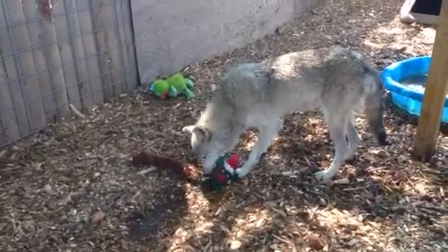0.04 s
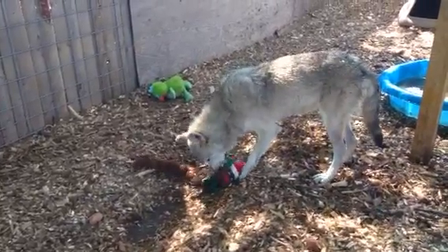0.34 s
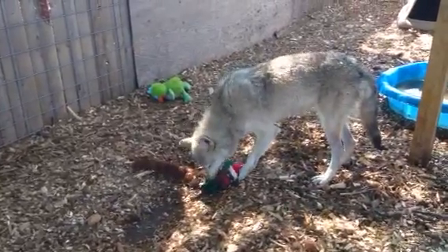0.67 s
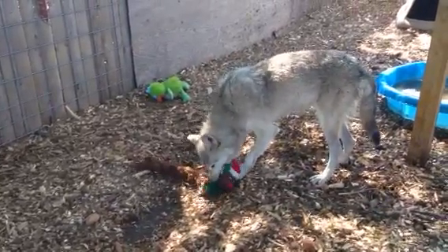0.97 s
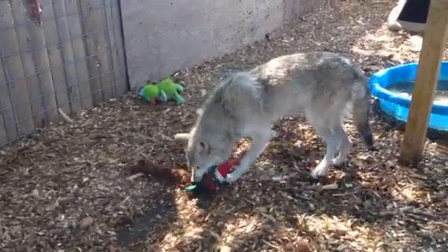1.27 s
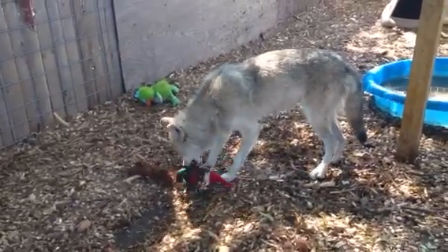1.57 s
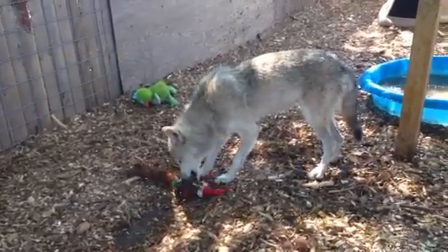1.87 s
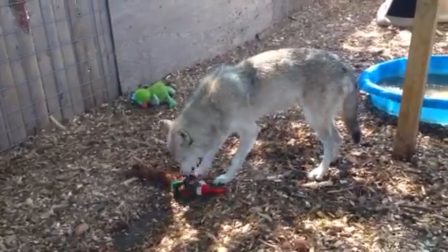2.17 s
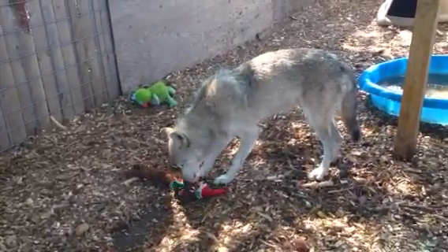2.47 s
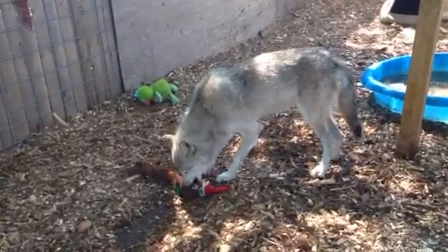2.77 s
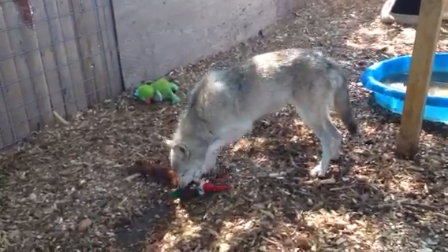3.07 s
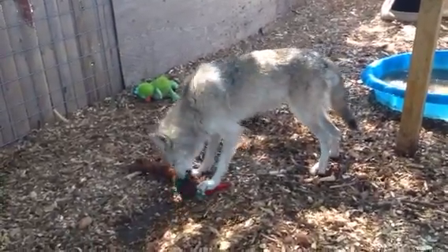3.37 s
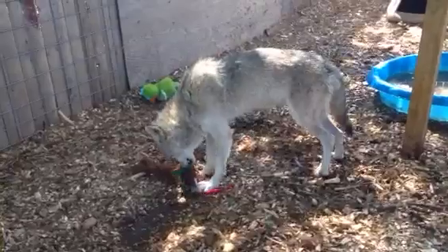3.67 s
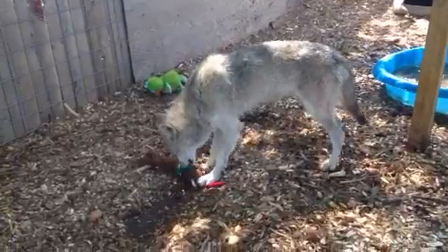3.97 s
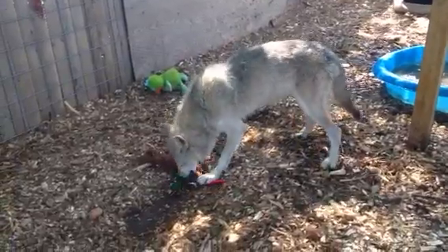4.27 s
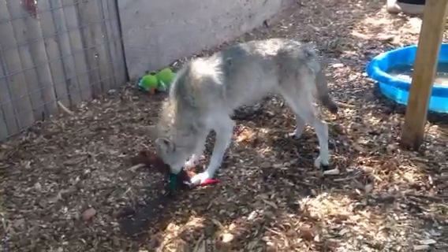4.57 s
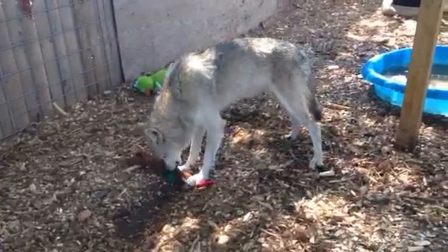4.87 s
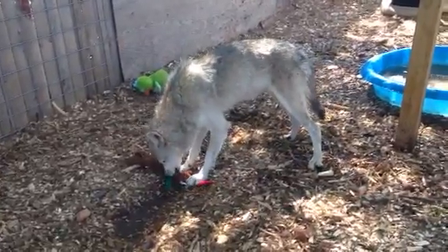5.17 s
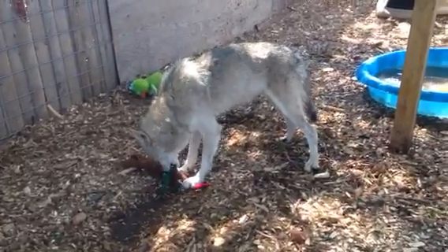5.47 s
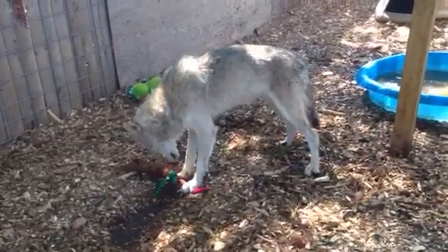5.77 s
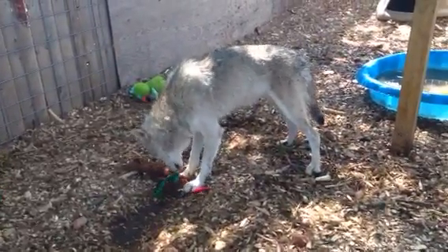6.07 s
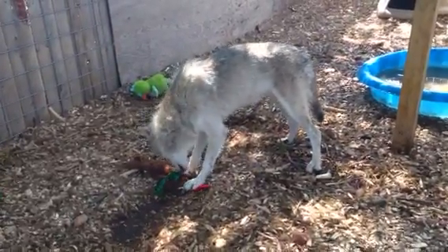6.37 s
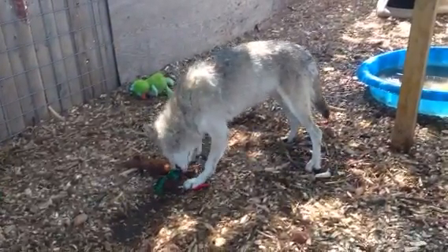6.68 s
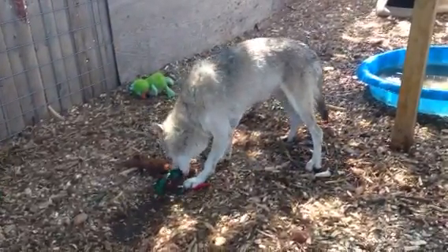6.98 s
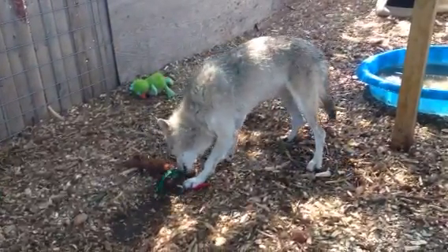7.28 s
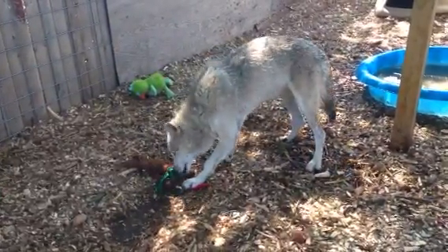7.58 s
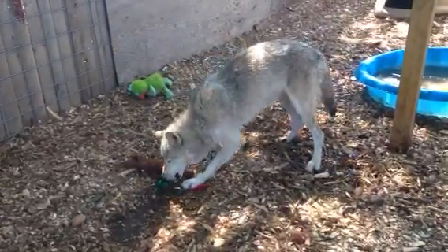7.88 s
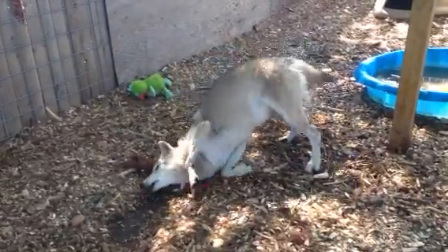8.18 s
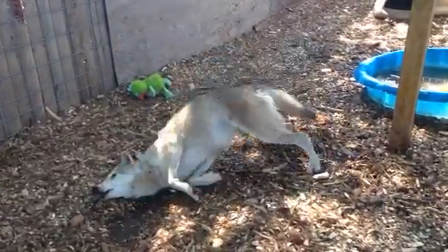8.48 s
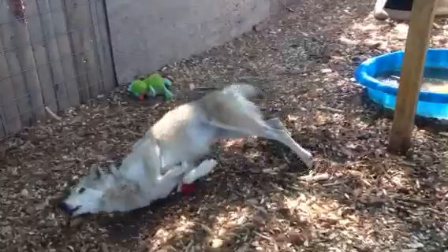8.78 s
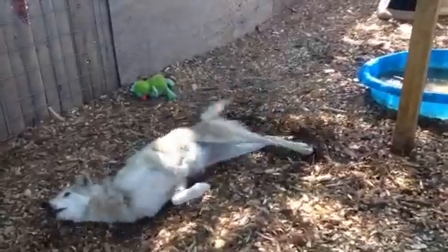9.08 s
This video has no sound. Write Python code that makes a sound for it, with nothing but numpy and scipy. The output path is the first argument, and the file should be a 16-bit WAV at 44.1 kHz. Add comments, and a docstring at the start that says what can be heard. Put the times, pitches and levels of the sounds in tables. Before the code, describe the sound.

Short, high squeaks and small pops come in spaced clusters from a dog's toy outdoors, with faint wood chip crackle and far traffic.

```python
"""A plush toy squeaks as a dog bites and rolls on it, in a fenced yard covered with wood chips.
Each squeeze drives one to three reeds, whose pitch rises with the air flow; plush and jaws colour
the squeaks and the fence throws them back. Squeaker bulbs pop and chips crackle under the dog.
Behind it all, faint calls whistle, insects buzz and traffic rumbles far off."""
import sys
import numpy as np
from scipy import signal
from scipy.fft import rfft, irfft
from scipy.io import wavfile
from scipy.ndimage import uniform_filter1d

SR = 44100
rng = np.random.default_rng(int(sys.argv[2]) if len(sys.argv) > 2 else 0)


def bounce(signal):
    """Save signal as a 16-bit WAV file at the path given by the first command-line argument."""
    frames = np.transpose(np.atleast_2d(signal))
    limited = np.clip(frames, -1, 1)
    pcm = np.round(limited * 32767).astype(np.int16)
    wavfile.write(sys.argv[1], SR, pcm)


N = 403074
TIME = np.arange(N) / SR

# Quick squeaks, one reed each; rows that overlap are reeds of one squeeze:
# start_s, rise_s, fall_s, crest_width_s, first_hz, top_hz, last_hz, level_db, echo_db, colour
SQUEAKS = [ (1.4268, 0.0037, 0.01, 0.027, 1366, 1452, 1240, -20.5, -16, "bright"),
           (1.487, 0.0021, 0.032, 0.011, 1690, 1750, 1064, -35.5, -1.5, "whistle"),
           (1.626, .008, 0.088, .018, 1700, 3500, 1096, -31.5, -8, "open"),
           (1.658, 0.0068, 0.0185, 0.011, 1432, 1454, 1178, -39.5, -13, "open"),
           (4.551, 0.013, 0.047, 0.017, 2176, 3740, 1800, -28.5, -8, "harsh"),
           (4.559, 0.011, 0.062, .012, 1144, 1572, 1026, -30.5, -11, "harsh"),
           (5.6754, 0.0028, 0.011, 0.019, 1550, 1590, 1330, -38, -18, "hollow"),
           (5.801, .006, 0.0091, 0.0069, 963, 1113, 990, -34, -13, "bitten"),
           (6.73, 0.011, 0.068, 0.074, 1150, 1181, 1076, -40, -12.5, "reedy"),
           (6.865, 0.025, .018, 0.0095, 1145, 1290, 1015, -40, -11.5, "reedy"),
           (8.224, .022, 0.034, 0.016, 1430, 3480, 1390, -37, -12.5, "thin"),
           (8.24, 0.0055, 0.019, 0.017, 1117, 1143, 1044, -39.5, -20, "thin"),
           (8.243, 0.024, 0.057, 0.022, 2080, 2160, 1860, -46.5, -9, "thin"),
           (8.334, .038, .050, .020, 1122, 1580, 1006, -40, -10.5, "muffled"),
           (8.334, .005, .057, 0.038, 1135, 1150, 933, -45, -3, "muffled"),
           (8.412, .020, 0.036, 0.0138, 1976, 2137, 1736, -51.5, -5.5, "raspy"),
           (8.415, .022, 0.024, .015, 1397, 1677, 1410, -55.5, -10, "raspy"),
           (8.533, 0.02, .083, 0.079, 1140, 1181, 1027, -48, -12.5, "buried"),
           (8.758, .014, 0.013, .012, 1145, 1304, 1190, -53.5, -18, "buried")]
# Two held squeezes, the reed following the jaws: time_s, pitch_hz, level_db
OVERBLOWN_SQUEAK = [(1.440, 5470, -46), (1.460, 5550, -43.5), (1.466, 4857, -29.5), (1.477, 4920, -33),
                    (1.483, 4800, -33.5), (1.490, 2830, -33.5), (1.500, 1840, -45)]
DRAWN_OUT_SQUEAK = [(4.336, 1440, -50), (4.362, 2030, -41), (4.383, 2600, -40), (4.41, 1880, -42),
                    (4.455, 1610, -44.5), (4.49, 1700, -45), (4.515, 1970, -42), (4.535, 2650, -37),
                    (4.558, 2000, -48)]
# Named squeak colours, as plush and jaws cover the squeaker more or less: frequency_hz, gain_db
SQUEAK_COLOURS = { "bright": [(590, -44.5), (1000, -13.5), (1360, -15.5), (1920, -31.5), (2770, -16),
                  (3220, -11.5), (4190, -15.5), (7440, -14), (9690, -2), (15500, -22.5)],
                  "whistle": [(590, -51.5), (1000, -17), (1700, -11.5), (2560, -7), (4390, -13.5),
                  (4920, -4), (5780, -10.5), (8640, -13.5), (9800, -2.5), (10900, -16), (15500, -17.5)],
                  "open": [(590, -54), (1000, -4), (1300, -12.5), (1640, -8), (2500, -3), (3780, -9.5),
                  (4100, -10), (5150, -7), (10100, -8.5), (15500, -22)], "nasal": [(700, -45), (1400, -6),
                  (2500, -0.5), (3300, -4.5), (5000, -2.5), (6700, -11), (7400, -22), (8400, -6.5),
                  (9900, 2), (15500, -11)], "harsh": [(600, -28), (1000, -3.5), (1500, -2), (2300, -10.5),
                  (3700, -8.5), (4300, -12), (6000, -9.5), (7300, -11), (10000, -14.5), (15500, -27)],
                  "hollow": [(710, -43), (1200, -4), (1470, -5.5), (2050, -26), (3010, -6.5), (4620, -16),
                  (5040, -23), (7480, -6), (15500, -43)], "bitten": [(590, -20), (1000, 2), (1500, -16),
                  (2260, -10), (3780, -7), (4980, -18), (8060, -11.5), (15500, -20)], "reedy": [(600, -3),
                  (1130, 4.5), (1500, -18), (2300, -8.5), (3500, -8.5), (4650, -11), (5900, -10),
                  (7600, -23), (9100, -14), (10600, -7), (15500, -24)], "thin": [(530, -54), (900, -33),
                  (1100, -2), (1270, -8), (2100, -13.5), (3300, -10), (4230, -12.5), (5100, -26),
                  (5700, -10), (6300, -11), (6820, -21), (8340, -14), (15500, -38)], "muffled": [(530, -43),
                  (900, -10), (1050, -9), (1560, -13), (1690, -16), (2200, -22), (3070, -26.5),
                  (8960, -28.5), (15500, -46)], "raspy": [(1000, -4), (2000, -6), (3000, -12), (4300, -16),
                  (9000, -17), (15000, -19)], "buried": [(1100, 0), (2300, -13.5), (3500, -18), (5000, -28),
                  (15000, -34)]}
# Soft pops of the squeaker bulbs: start_s, level_db, pitch_hz, t60_s
BULB_POPS = [(1.427, -44, 256, 0.034), (4.561, -35.5, 374, 0.009), (4.7062, -29.5, 706, 0.019),
             (4.707, -35.5, 393, 0.022), (5.674, -25.5, 519, 0.0048), (5.8027, -29.5, 220, 0.034),
             (5.8031, -31.5, 364, 0.047), (5.8045, -28.5, 590, 0.032), (5.8095, -25.5, 800, 0.013),
             (6.166, -46.5, 420, 0.038), (6.742, -42, 650, 0.013), (6.745, -50, 330, 0.03),
             (6.754, -37.5, 830, 0.03), (6.889, -41, 670, 0.017), (8.452, -39.5, 738, 0.011),
             (8.622, -42, 560, 0.016)]
# Short bright snaps, mostly single chips breaking, plus the crunch of the bite at 5.8 s: start_s, level_db,
# centre_hz
SNAPS = [(.905, -54, 13000), (1.417, -43, 5000), (2.722, -46, 13500), (2.873, -42, 13200),
         (3.57, -52, 12000), (5.071, -49.5, 4070), (5.3, -48.5, 9000), (5.391, -47.5, 3000),
         (5.805, -23.5, 1570), (6.045, -53, 7070), (6.933, -53, 8000), (7.27, -57, 6000),
         (8.303, -37, 5070)]
# A paw or the muzzle shoves the chips: start_s, length_s, level_db
CHIP_SHOVES = [(.35, 0.059, -76), (.70, .07, -75), (1.186, 0.16, -68), (1.36, 0.15, -69), (1.83, .12, -71),
               (2.278, 0.14, -66), (2.948, 0.57, -73), (3.72, 0.17, -76), (4.03, 0.033, -71),
               (4.13, .06, -71), (4.245, 0.07, -64), (7.0, 0.3, -78), (8.1, 0.27, -73)]
# Colour of the crackling chips: frequency_hz, gain_db
CHIP_COLOUR = [(800, -1), (2000, -0.5), (5000, -1.5), (9000, -0.5), (12000, -0.5), (15500, -0.5)]
# The body scuffs the ground as the dog drops and rolls: time_s, level_db
SCUFF_LEVELS = [(7.95, -100), (8.1, -66.5), (8.3, -62.5), (8.45, -64.5), (8.55, -64), (8.7, -58),
                (8.85, -58), (9.14, -60.5)]
# Dull colour of that scuff: frequency_hz, gain_db
SCUFF_COLOUR = [(80, -19), (200, 8.5), (350, 4), (700, 5), (1500, -18), (3000, -16.5), (9000, -17.5)]
# Slaps off fence and wall: delay_s, strength
FENCE_ECHOES = [(.0135, 0.23), (0.019, 0.47), (0.0257, 0.25), (.033, .35), (.046, 0.11)]
# Decay of the yard's scattered tail: frequency_hz, t60_s
YARD_DECAY = [(200, 0.27), (1500, 0.15), (2600, 0.14), (3400, 0.25), (4500, 0.21), (9000, 0.28),
              (15000, 0.14)]
# Thin tones that linger in the yard after a squeak: pitch_hz, level_db, t60_s
AFTER_RING = [(1122, -30.5, .5), (3070, -27, .25), (3690, -30.5, 0.38)]
# Faint far calls: start_s, length_s, first_hz, last_hz, level_db
FAR_CALLS = [(3.0, 0.13, 8150, 8050, -73), (4.066, .06, 586, 550, -55), (4.09, 0.068, 4900, 5060, -68),
             (4.297, .13, 3120, 3020, -56), (5.54, 0.13, 7500, 8100, -76)]
# Swells of the insects in the trees, distant engines and tyres on the far road: time_s, level_db
INSECT_LEVELS = [(0, -62.5), (.8, -66), (1.4, -66.5), (2.2, -73), (3, -77), (5.6, -81.5), (6.5, -76.5),
                 (7.2, -67.5), (7.8, -63.5), (9.14, -61.5)]
ENGINE_LEVELS = [(0, -57.5), (1.0, -57), (1.55, -53), (1.85, -55.5), (2.12, -49.5), (2.5, -54.5),
                 (2.8, -51), (4.05, -50), (4.4, -58), (5.6, -56.5), (6.3, -60), (9.14, -59.5)]
TYRE_LEVELS = [(0, -64), (1.5, -62), (1.95, -60.5), (2.25, -58), (2.6, -60.5), (3.6, -60), (4.8, -61.5),
               (5.9, -61), (7.2, -62.5), (8.2, -64), (9.14, -62)]
# Colours of those three beds: frequency_hz, gain_db
INSECT_COLOUR = [(1880, -29.5), (2750, -7), (3200, -3.5), (3370, -1.5), (3640, -3.5), (3820, -1.5),
                 (4130, -4.5), (4660, -4), (4950, -2.5), (5970, 0), (6740, -4), (7700, -12.5),
                 (8510, -23.5), (9000, -25), (11700, -49), (19800, -120)]
ENGINE_COLOUR = [(20, -40.5), (28, -28), (40, -10), (54, -8.5), (62, 2.5), (70, 6), (81, -2), (94, 0),
                 (112, 2), (130, -6), (190, -12.5), (250, -25), (330, -35.5), (600, -71)]
TYRE_COLOUR = [(120, -33), (200, -4), (253, -8), (300, -8), (420, -10), (560, -10.5), (728, -5),
               (940, -7.5), (1110, -4.5), (1380, -6), (1910, -13), (2210, -12), (2850, -17), (3550, -19),
               (10600, -33), (14700, -37), (15500, -42.5)]

ROUND_S, CREST_POWER = .016, 2.5  # a quick bite has a pointed crest; slower ones round up to this power
SLACK_DB, SLACK_OCTAVES = 10, 0.47  # a reed softens this much as it sags, mostly over this interval
RELEASE_DB = 8.5  # the last fade as the air runs out
SHOVE_RISE, SHOVE_FADE_DB = .25, 13  # share of a shove spent swelling; fade per shove length after that
TREBLE_EDGE_HZ = 15550


def toy(overblown_echo_db=-5.5, drawn_out_echo_db=-6):
    """Jaws force air through the reeds. Gives the direct squeaks and their send to the yard."""
    direct, thrown = np.zeros(N), np.zeros(N)
    quick = [(squeeze(*shape), echo_db, colour) for *shape, echo_db, colour in SQUEAKS]
    held = [(OVERBLOWN_SQUEAK, overblown_echo_db, "whistle"),
            (DRAWN_OUT_SQUEAK, drawn_out_echo_db, "nasal")]
    for rows, echo_db, colour in quick + held:
        start, squeak = reed(rows, SQUEAK_COLOURS[colour])
        add(direct, start, among_legs(squeak, echo_db))
        add(thrown, start, amp(echo_db) * squeak)
    return direct, thrown


def squeeze(start, rise, fall, width, first_hz, top_hz, last_hz, db):
    """Air flow crests and ebbs, taking pitch and loudness along. Gives time_s, pitch_hz, level_db."""
    t = np.concatenate([np.linspace(-rise, 0, 20, endpoint=False), np.linspace(0, fall, 40)])
    roundness = min(1 + rise / ROUND_S, CREST_POWER)
    ebb = 1 - 1 / (1 + (abs(t) / width) ** roundness)
    depth = np.where(t < 0, np.log2(top_hz / first_hz) / ebb[0], np.log2(top_hz / last_hz) / ebb[-1])
    octaves_down = ebb * depth
    slack = np.tanh(octaves_down / SLACK_OCTAVES)
    release = np.maximum(t / fall, 0) ** 6
    level_db = db - SLACK_DB * slack - RELEASE_DB * release
    return np.column_stack([start + rise + t, top_hz / 2 ** octaves_down, level_db])


def reed(rows, colour, air_db=-11, uneven_db=2.5):
    """A reed chops the air into sharp, uneven pulses; air hisses through at each opening."""
    start, hz, gain = glide(rows)
    n, rough = len(hz), rattle(hz, gain)
    jitter = (.004 + .012 * rough ** 2) * wander(n, rate_hz=700)
    wobble = .012 * rough * wander(n, rate_hz=90)
    hz = hz * (1 + jitter + wobble)
    phase = 2 * np.pi * np.cumsum(hz) / SR
    tone, power = np.zeros(n), np.zeros(n)
    for k in range(1, 16):
        # the jaws shift over the reed, so each overtone swells and fades
        height = amp(read(colour, k * hz) + uneven_db * wander(n, rate_hz=33))
        height *= np.clip((TREBLE_EDGE_HZ - k * hz) / 300 + 1, 0, 1)
        flutter = 1 + .4 * rough * wander(n, rate_hz=250)
        tone += height * flutter * np.cos(k * phase + 0.56 * rng.standard_normal())
        power += height ** 2 / 2
    air = unit(coloured(rng.standard_normal(n), colour) * (1 + np.cos(phase)))
    air_gain = amp(air_db) * (.35 + 0.5 * rough)
    return start, gain * (tone / np.sqrt(power + 1e-12) + air_gain * air)


def glide(rows):
    """Start time, smooth pitch and click-free gain of one squeak."""
    times, hz, db = np.transpose(rows)
    times = np.sort(times)
    t = np.arange(times[0], times[-1] + 0.00042, 1 / SR)
    edges = np.clip(np.minimum(t - t[0], t[-1] - t) / 0.00072, 0, 1)
    pitch = uniform_filter1d(np.interp(t, times, hz), size=160)
    return times[0], pitch, amp(np.interp(t, times, db)) * edges


def rattle(hz, gain):
    """Roughness 0-1: a reed rattles when blown hard, and near the break to its whistle register."""
    hard = np.clip((20 * np.log10(gain + 1e-9) + 47) / 22, 0, 1)
    near_break = np.exp(-(np.log2(hz / 3000) / .8) ** 2)
    return np.clip(.55 * hard + .65 * near_break, 0, 1)


def among_legs(squeak, echo_db):
    """Ground, muzzle and legs scatter a squeak within a few ms, which smears its fast glides."""
    t = np.arange(SR // 70) / SR
    taps = rng.standard_normal(len(t)) * np.exp(-t / .007) * (t > .001)
    taps *= amp(echo_db + 5.5) / np.linalg.norm(taps)
    taps[0] = 1  # the direct path
    return signal.fftconvolve(squeak, taps / np.linalg.norm(taps))


def bulb_pops():
    """A plastic bulb buckles: one damped low ring with a dull puff through the plush."""
    out, t = np.zeros(N), np.arange(SR // 10) / SR
    plush = signal.butter(3, 1200, fs=SR)
    attack = 1 - np.exp(-t / .0003)
    for start, db, hz, t60 in BULB_POPS:
        puff = unit(signal.lfilter(*plush, rng.standard_normal(len(t))))
        ring = np.sin(2 * np.pi * hz * t)
        add(out, start, amp(db - 60 * t / t60) * attack * (ring + .3 * puff))
    return out


def snaps(width_octaves=0.7, t60_s=.012):
    """A dry chip breaks, or the jaws crunch the toy, with a short bright tick."""
    out, t = np.zeros(N), np.arange(2048) / SR
    hz = np.fft.rfftfreq(len(t), 1 / SR) + 1
    for start, db, centre_hz in SNAPS:
        band = np.exp(-(np.log2(hz / centre_hz) / width_octaves) ** 2)
        crack = irfft(rfft(rng.standard_normal(len(t))) * band)
        add(out, start, amp(db - 60 * t / t60_s) * unit(crack) / 2)
    return out


def chip_crackle(cracks_per_s=2000, uneven_db=0.5, grain_s=.0007):
    """Stirred chips give off many tiny cracks of uneven size."""
    hits = rng.random(N) < cracks_per_s / SR
    sizes = amp(uneven_db * np.minimum(rng.exponential(1, N), 4))
    decays = signal.lfilter([1], [1, -np.exp(-1 / (grain_s * SR))], hits * sizes)
    grains = decays * rng.standard_normal(N)
    return coloured(grains, CHIP_COLOUR, level_band_hz=(9000, 15000)) * stirring()


def stirring(fidget_db=-86.5, roll_vs_scuff_db=-9.5):
    """How hard the dog stirs the chips: steady fidgeting, single shoves, then the roll."""
    gain = amp(fidget_db) + amp(roll_vs_scuff_db) * follow(SCUFF_LEVELS)
    for start, length, db in CHIP_SHOVES:
        progress = np.arange(0, length, 1 / SR) / length
        swell = np.minimum(progress / SHOVE_RISE, 1)
        fade_db = SHOVE_FADE_DB * np.maximum(progress - SHOVE_RISE, 0)
        add(gain, start, swell * amp(db - fade_db))
    return gain


def body_scuff(lumps_db=3):
    """The rolling body rubs the ground with a dull, lumpy scuff."""
    rub = coloured(rng.standard_normal(N), SCUFF_COLOUR)
    lumps = amp(lumps_db * wander(N, rate_hz=14))
    return unit(rub * lumps) * follow(SCUFF_LEVELS)


def yard(send, scatter_db=-1, taps_per_s=3000):
    """A few echoes from fence and wall, in a short scattered tail with a thin after-ring."""
    taps = rng.standard_normal(SR // 2) * (rng.random(SR // 2) < taps_per_s / SR)
    hz, frame_s, spectra = signal.stft(taps, SR, nperseg=256)
    decay = amp(-60 * frame_s / read(YARD_DECAY, hz)[:, None])
    tail = signal.istft(spectra * decay, SR, nperseg=256)[1]
    t = np.arange(len(tail)) / SR
    tail *= np.minimum(t / 0.0014, 1)
    tail *= amp(scatter_db) / np.linalg.norm(tail)
    for ring_hz, db, t60 in AFTER_RING:
        ring = np.sin(2 * np.pi * ring_hz * t) * amp(-60 * t / t60)
        tail += amp(db) * ring / np.linalg.norm(ring)
    for delay, strength in FENCE_ECHOES:
        add(tail, delay, np.array([strength]))
    return signal.fftconvolve(send, tail / np.linalg.norm(tail))[:N]


def far_calls(swell_db=21):
    """Thin wavering whistles swell and sink beyond the fence; the high ones are buzzy."""
    out = np.zeros(N)
    for start, length, first_hz, last_hz, db in FAR_CALLS:
        progress = np.arange(0, length, 1 / SR) / length
        waver = 1 + .022 * wander(len(progress), rate_hz=220)
        hz = (first_hz + (last_hz - first_hz) * progress) * waver
        gain = amp(db - swell_db * (2 * progress - 1) ** 2)
        add(out, start, gain * np.sqrt(2) * np.sin(2 * np.pi * np.cumsum(hz) / SR))
    return out


def insects(throb_db=1.02):
    """A chorus ebbs and returns; every insect keeps its own pitch, making a cluster of narrow lines."""
    spectrum = rfft(rng.standard_normal(N))
    lines = amp(3.5 * np.tanh(wander(N // 2 + 1, rate_hz=50)))
    chorus = coloured(irfft(spectrum * lines, N), INSECT_COLOUR)
    throb = amp(throb_db * wander(N, rate_hz=50))
    return chorus * follow(INSECT_LEVELS) * throb


def traffic(engine_trim_db=1):
    """Engines rumble and tyres hiss on a far road, in slow swells."""
    engines = coloured(rng.standard_normal(N), ENGINE_COLOUR)
    tyres = coloured(rng.standard_normal(N), TYRE_COLOUR, level_band_hz=(500, 2200))
    return amp(engine_trim_db) * engines * follow(ENGINE_LEVELS) + tyres * follow(TYRE_LEVELS)


def amp(db):
    """Decibels to gain."""
    return 10 ** (np.asarray(db) / 20)


def unit(x):
    """Scales to rms 1."""
    return x / np.sqrt(np.mean(x ** 2) + 1e-20)


def read(points, hz):
    """A curve's value at hz, on a log-frequency axis."""
    point_hz, value = np.transpose(points)
    return np.interp(np.log(hz + 1), np.log(point_hz + 1), value)


def follow(rows):
    """Rides the fader: the gain of a level curve at every sample."""
    times, db = np.transpose(rows)
    return amp(np.interp(TIME, times, db))


def add(mix, start_s, sound):
    """Mixes a sound in at start_s."""
    part = mix[max(round(start_s * SR), 0):][:len(sound)]
    part += sound[:len(part)]


def coloured(x, colour, level_band_hz=(20, 16000)):
    """Equalises x to a colour, with rms 1 inside the band."""
    hz = np.fft.rfftfreq(len(x), 1 / SR)
    spectrum = rfft(x) * amp(read(colour, hz))
    in_band = (hz > level_band_hz[0]) * (hz < level_band_hz[1])
    return irfft(spectrum, len(x)) / np.std(irfft(spectrum * in_band, len(x)))


def wander(n, rate_hz):
    """Smooth random drift of rms about 1, moving at up to rate_hz."""
    size = max(n, SR)
    hz = np.fft.rfftfreq(size, 1 / SR)
    spectrum = rfft(rng.standard_normal(size)) / (1 + (hz / rate_hz) ** 4)
    return unit(irfft(spectrum, size))[:n]


def scene(knock_echo_db=-15, far_echo_db=-4):
    """The toy and the chips up front in the yard, over a bed of traffic and insects."""
    squeaks, thrown = toy()
    knocks = bulb_pops() + snaps()
    calls = far_calls()
    echo = yard(thrown + amp(knock_echo_db) * knocks + amp(far_echo_db) * calls)
    ground = amp(-3) * chip_crackle() + body_scuff()
    bed = traffic() + amp(-1) * insects()
    return (squeaks + knocks + ground + echo + 0.94 * calls + bed)[None]


def record(dry, hiss_db=-76.5):
    """Faint microphone hiss, then a steep cut of the top treble."""
    hissy = dry + amp(hiss_db) * rng.standard_normal(N)
    lowpass = signal.firwin(511, TREBLE_EDGE_HZ, window=("kaiser", 9), fs=SR)
    return signal.oaconvolve(hissy, lowpass[None], "same")


dry = scene()
out = record(dry)
bounce(out)
```